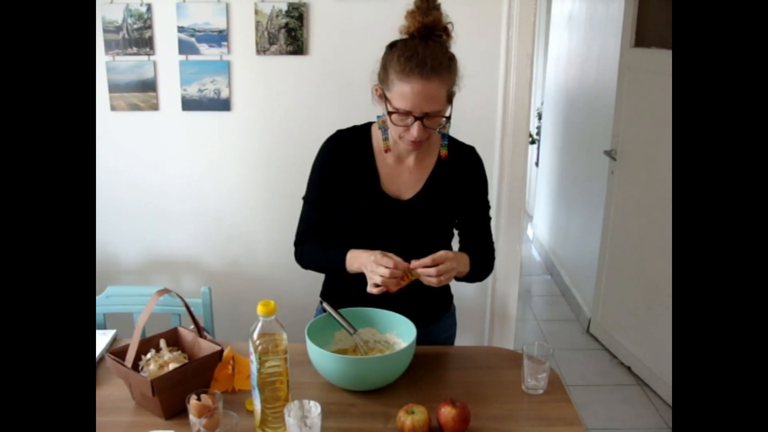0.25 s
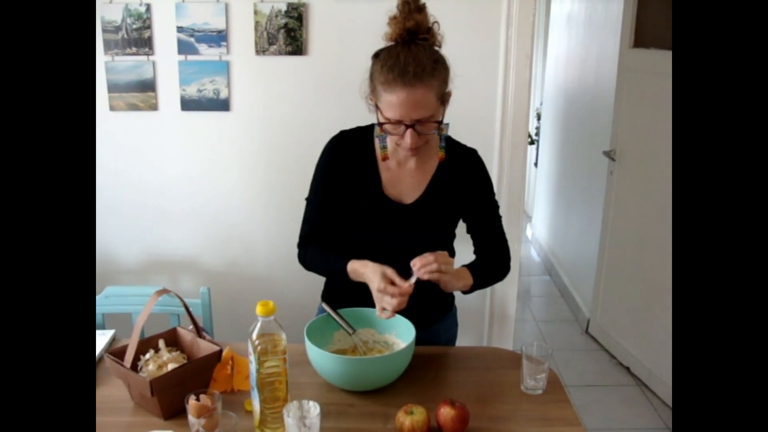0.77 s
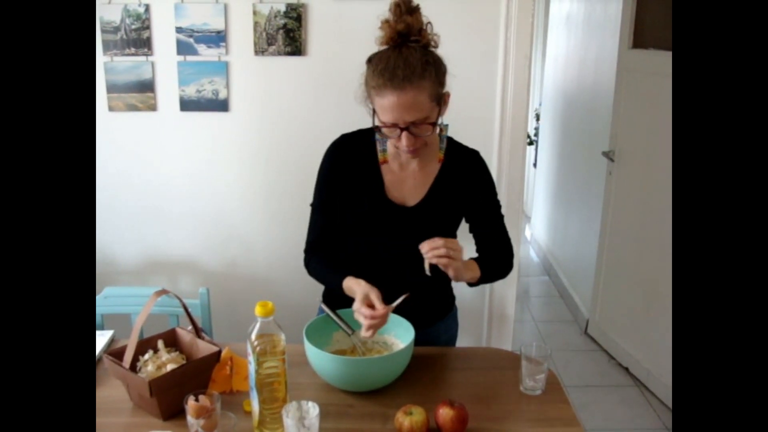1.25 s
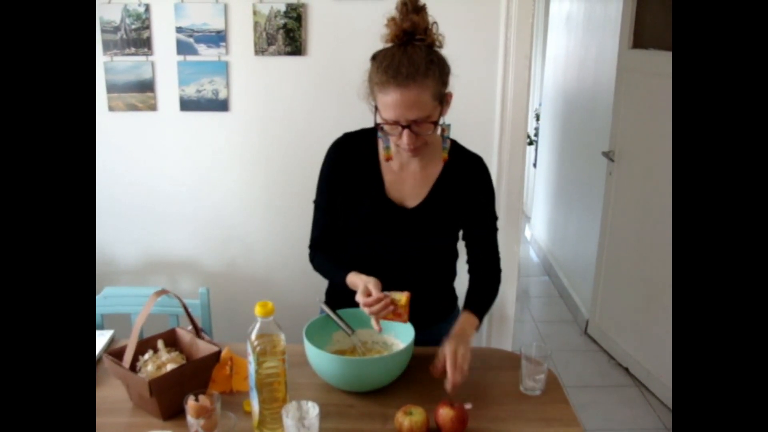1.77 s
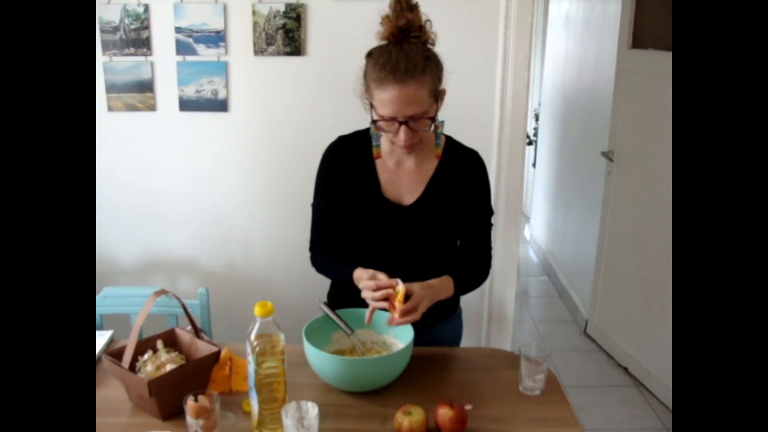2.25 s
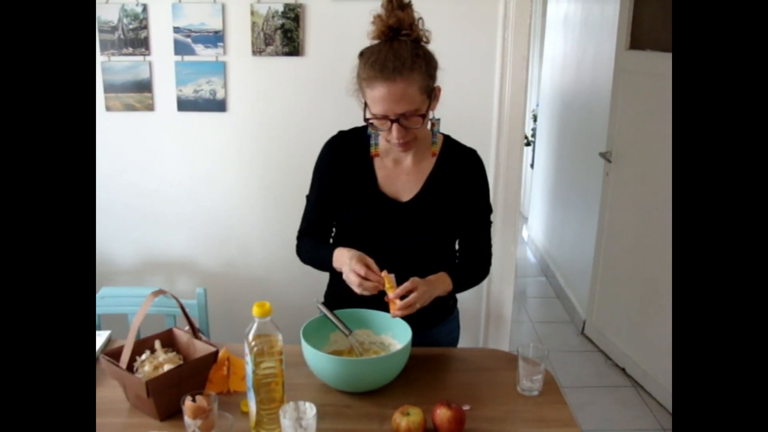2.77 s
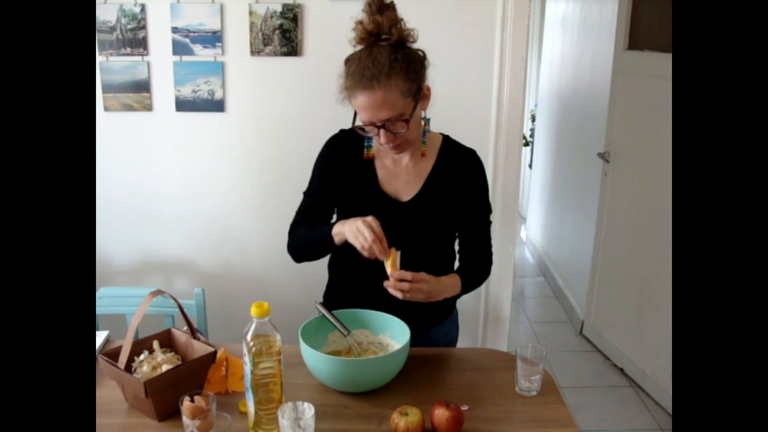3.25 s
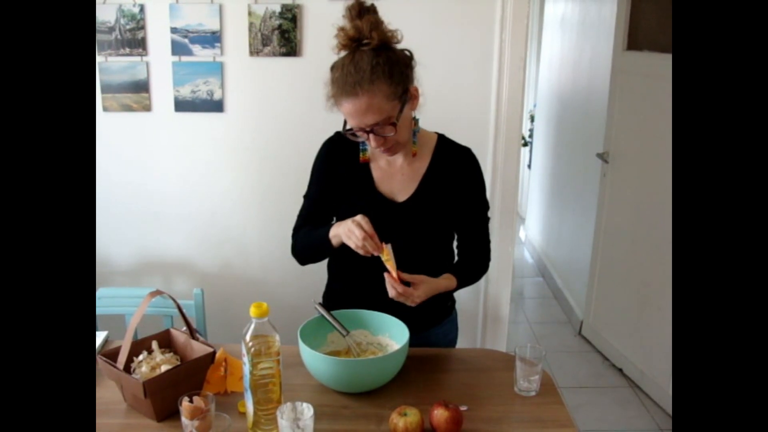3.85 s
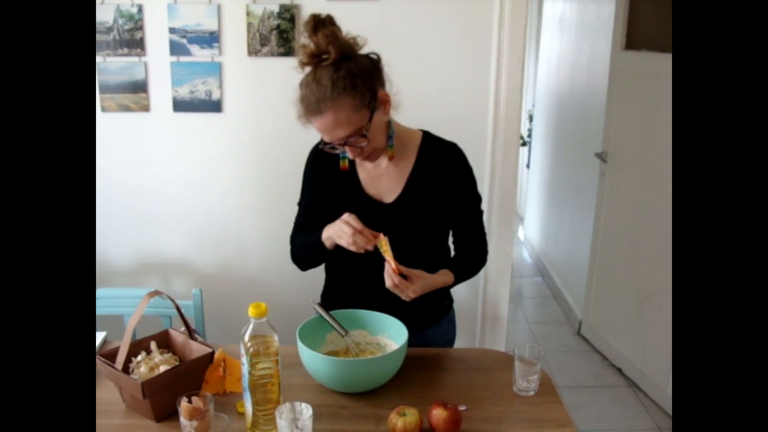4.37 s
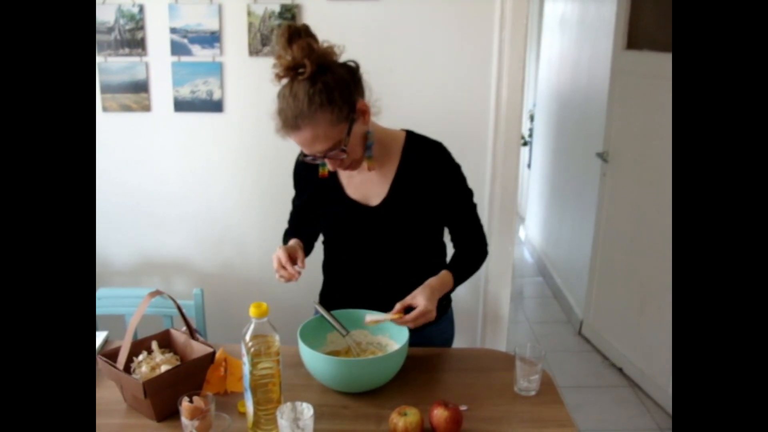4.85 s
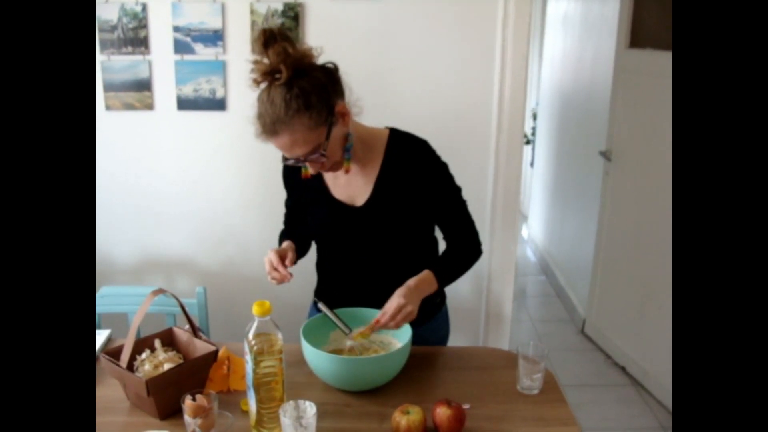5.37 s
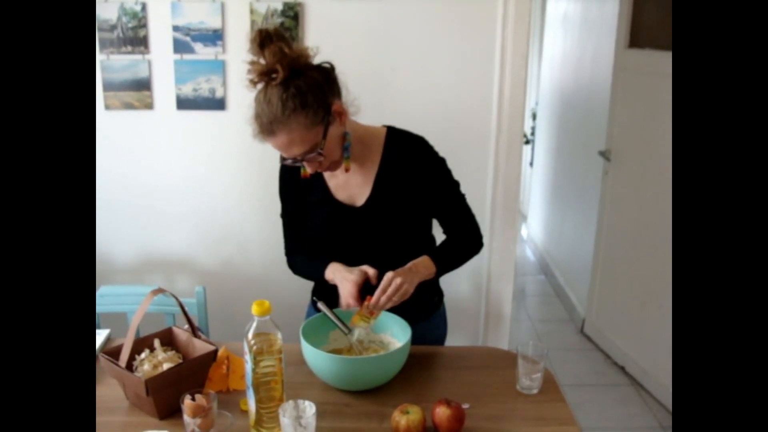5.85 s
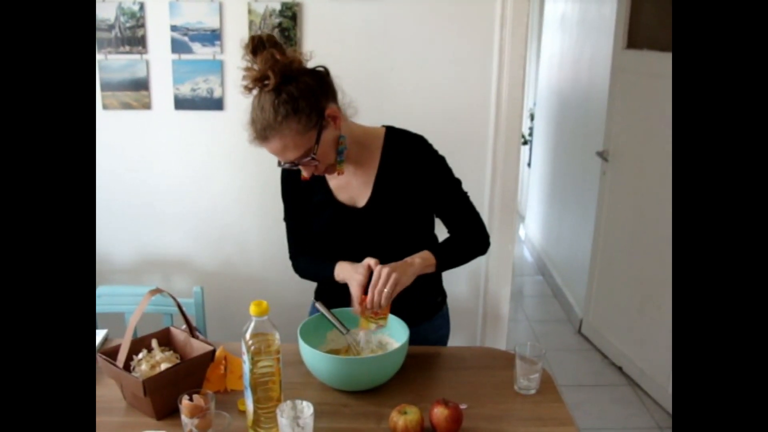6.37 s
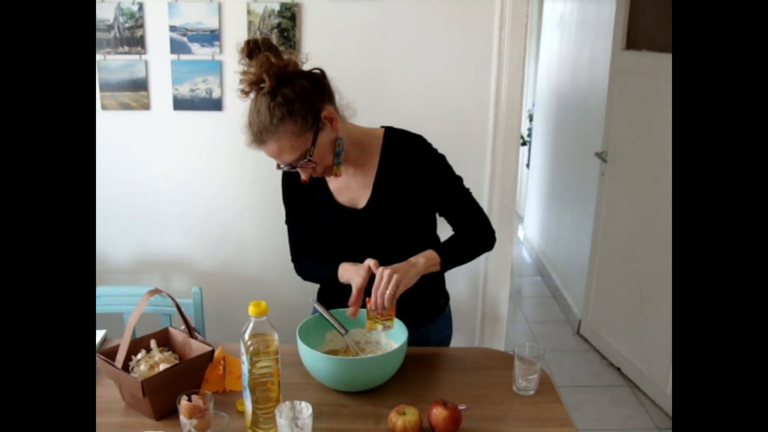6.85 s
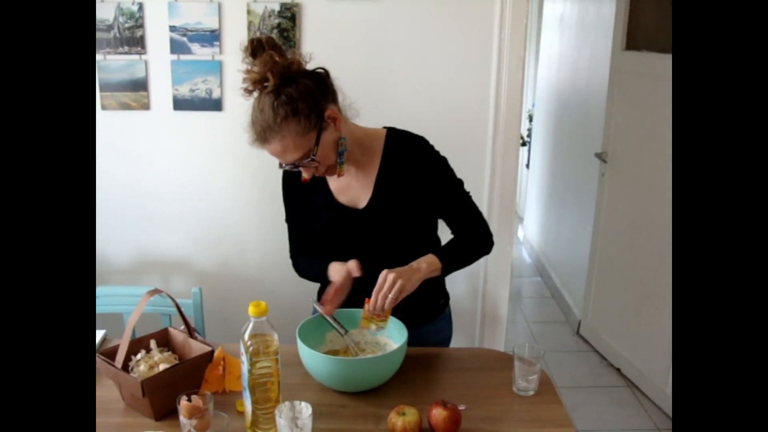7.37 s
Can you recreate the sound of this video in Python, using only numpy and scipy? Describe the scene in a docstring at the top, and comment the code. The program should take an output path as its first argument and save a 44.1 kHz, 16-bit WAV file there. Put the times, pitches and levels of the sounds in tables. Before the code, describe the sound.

A small paper packet is ripped open and crinkled in a hard kitchen, then briskly tapped over a bowl above steady hiss.

```python
"""A paper packet is ripped open in two pulls, made of grains of noise for the fibres letting go.
Fingers slide on it as rubbed noise and its creases snap as short impulses; a hand lands on a wooden table.
The packet is then tapped over a bowl, about six strong taps a second, with springing paper between them.
A small hard-walled kitchen answers every paper and hand sound with scattered echoes and a short tail.
Underneath lie a steady hiss with narrow whines and a low drone that swells near the end."""
import sys
import numpy as np
from scipy import signal
from scipy.fft import rfft, irfft, next_fast_len
from scipy.io import wavfile
from scipy.ndimage import map_coordinates

SR = 44100
rng = np.random.default_rng(int(sys.argv[2]) if len(sys.argv) > 2 else 0)


def to_wav(sig):
    """Store sig (one row per channel, or 1-D mono) as 16-bit WAV at the path in sys.argv[1].

    Samples outside -1..1 are clipped; the rate is SR.
    """
    pcm = np.clip(np.atleast_2d(sig), -1, 1) * 32767
    pcm = np.round(pcm).astype(np.int16)
    wavfile.write(sys.argv[1], SR, pcm.T)  # frames by channels


N = 335160
SHOT = 16384  # samples in one short sound or impulse response
TIME, SHOT_TIME = np.arange(N) / SR, np.arange(SHOT) / SR
SHOT_HZ = np.fft.rfftfreq(SHOT, 1 / SR)
TOP_HZ = 10080  # end of the treble

# Colour of the background hiss. Each row: frequency in Hz, relative level in dB.
HISS_COLOUR = [(13, -50), (22, -12), (171, -2), (244, -2.5), (429, -2.5), (540, -4), (924, -4), (1050, -6),
               (1620, -10), (1940, -9.5), (2570, -11.5), (2930, -7), (3410, -11.5), (5010, -12),
               (10000, -18), (13000, -62), (22000, -120)]
# Narrow whines in the hiss. Each row: frequency in Hz, width in Hz, lift in dB.
WHINES = [(917, 22, 7), (1370, 75, 5.5), (1940, 230, 6), (2893, 48, 8)]
# Low drone over time. Each row: time in seconds, level in dB.
DRONE_LEVELS = [(0, -82), (5.7, -78.5), (6.3, -64.5), (6.8, -74), (7.6, -78)]
HISS_DB, WHINE_DB = -53.5, -69.5
WAVER_DB, WAVER_RATE = 2, 4.7  # the highest whine comes and goes: depth, random points a second

# Decay of the room. Each row: frequency in Hz, time to fall 60 dB in seconds.
KITCHEN_DECAY = [(150, 0.4), (1000, 0.3), (2800, 0.28), (7000, 0.24), (10000, 0.2)]

# The hand landing on the table. Each row: start in seconds, strength in dB.
KNOCKS = [(1.648, -4.5), (1.656, -7.5)]
# Modes of the wooden table. Each row: frequency in Hz, mean level in dB, time to fall 60 dB in seconds.
WOOD_MODES = [(243, -11, 0.2), (321, -1.5, 0.12), (387, -0.5, 0.055), (438, 1.5, 0.061), (503, -7, 0.036),
              (591, -1, 0.083), (664, -2.5, 0.07), (986, -2, 0.05), (1130, 0.5, 0.042), (1490, -8, 0.083),
              (1690, -9, 0.067), (1950, -11, 0.045)]
# Dull bumps of the fingers on the packet. Each row: start in seconds, strength in dB, pitch in Hz.
BUMPS = [(2.786, -24, 385), (3.624, -26, 650), (3.644, -20.5, 616), (4.279, -17, 590), (4.372, -22, 610),
         (5.217, -15.5, 730)]

# Fingers sliding on the packet.
# Each row: moment of full level in seconds, length held in seconds, rub in dB, crinkle in dB.
SLIDES = [(0.01, 0.049, -61, -52), (0.626, 0.055, -47.5, -43.5), (0.761, .025, -51, -39.5),
          (1.338, 0.064, -61, -45.5), (2.243, 0.021, -74, -53.5), (2.45, 0.014, -49, -62),
          (2.875, 0.0079, -50, -74), (2.944, 0.053, -49, -46.5), (3.05, 0.035, -42, -44),
          (3.165, 0.04, -46, -47.5), (3.347, 0.089, -66, -50), (3.59, 0.09, -53, -50.5),
          (4.547, .12, -59, -64), (5.464, 0.028, -54, -45.5), (5.592, 0.0073, -62, -48),
          (5.937, .04, -54, -52), (6.1, 1.39, -59.5, -71), (6.317, .006, -55, -38), (6.758, .004, -54, -49)]
# Colour of skin on paper. Each row: frequency in Hz, relative level in dB.
RUB_COLOUR = [(150, -28), (400, -17.5), (650, -5), (1000, -2.5), (1600, 2), (2600, -3), (4000, -8),
              (10000, -55)]
# Colour of tiny wrinkles giving way. Each row: frequency in Hz, relative level in dB.
CRINKLE_COLOUR = [(1000, -24), (2500, 0), (3500, 0), (6500, -2), (10000, -13.5)]
SLIDE_ATTACK_S, SLIDE_RELEASE_S = 0.027, 0.021

# Resonances of the folded packet. Each row: frequency in Hz, width in Hz, lift in dB.
PACKET_RESONANCES = [(1526, 75, 6.5), (1930, 280, 5), (2360, 380, 6), (2930, 160, 2.5), (3360, 460, 3.5),
                     (3710, 310, 4), (5190, 1900, 1.5), (6030, 670, 2.5), (6800, 460, 3), (9400, 220, 0)]
# Colour of the puff of air. Each row: frequency in Hz, relative level in dB.
PUFF_COLOUR = [(50, -45), (300, -15.5), (470, -6.5), (600, 0), (750, -2), (970, -7), (1250, -1),
               (1700, -2.5), (3000, -37)]
FOLLOW_DELAY_S = 0.001412  # smaller folds give way this long after the first

# Creases snapping through.
# Each row: start in seconds, strength in dB, panel pitch in Hz, crack against the panel's ring in dB.
CREASES = [(0.1924, -12, 2810, 7), (0.2692, -19.5, 3000, 2), (0.3224, -13, 3030, -2.5),
           (0.4855, -10.5, 1500, 8.5), (0.5436, -15.5, 3580, 6), (0.5719, -17.5, 1510, -16),
           (0.5921, -13.5, 2320, 8), (0.6147, -12, 2200, 14), (0.7285, -8.5, 3670, 8),
           (1.3533, -13, 3150, 9), (1.4022, -7.5, 4240, 6), (1.6338, -6, 1720, 1), (2.3266, -20, 3690, 7),
           (2.388, -12.5, 3840, 7.5), (2.4299, -13.5, 3430, -2), (2.5032, -6, 4340, -4),
           (2.7036, -11, 3920, -17), (2.8926, 3.5, 3460, -0.5), (3.024, -10, 2110, -22),
           (3.041, -9, 2090, -5), (3.0749, -14, 1710, 6), (3.1611, -12, 1460, -17), (3.2053, 10, 2380, -1),
           (4.2752, -19, 2800, -22), (4.3707, -15, 2980, 1), (4.5361, -23, 3010, -22),
           (4.7017, -3.5, 2680, 1.5), (4.8434, -17, 1920, -11), (5.211, 2.5, 2650, 0),
           (5.3411, -12.5, 2140, -11), (5.4885, -16, 1910, -8), (5.866, -5, 4480, 1.5),
           (5.9009, -0.5, 2500, -4), (5.9773, -7, 3400, 1), (6.0209, -11.5, 1820, -5)]
# Colour of a crease's crack. Each row: frequency in Hz, relative level in dB.
CREASE_CRACK_COLOUR = [(2500, -33), (4300, -1.5), (5300, 2), (6400, 0), (7500, 1), (8600, 1.5), (10000, -9)]
CREASE_PUFF_DB = -13  # puff against the ring, for a crease of strength 0 dB
PUFF_PER_STRENGTH = -0.3  # the stronger a crease snaps, the less it puffs: dB per dB
CREASE_FOLLOW = 0.33  # share of the smaller folds that follow

# Finger taps and the packet springing back.
# Each row: start in seconds, strength in dB, crack against the panel's ring in dB.
TAPS = [(6.056, 5, -3.5), (6.0964, 5, -1), (6.1396, 4, 14), (6.2528, 6, -3), (6.316, 4, 11),
        (6.4294, 9, -0.5), (6.4365, 0.5, -12), (6.4768, -4, 0), (6.4892, 1, 12), (6.586, 3, -10),
        (6.5938, 2, 7), (6.656, -2, 1.5), (6.6852, -1.5, 17), (6.7737, 10, -4.5), (6.8223, -1.5, -3),
        (6.8678, -2, 7), (6.9284, 7, -3), (6.9937, 0, 1.5), (7.059, -2.5, 5), (7.1002, 9.5, -3.5),
        (7.1637, -5.5, -30), (7.23, -2, 7), (7.2768, 9, -3.5), (7.3355, -3.5, -10), (7.3966, -1, 9)]
# Colour of a tap's crack. Each row: frequency in Hz, relative level in dB.
TAP_CRACK_COLOUR = [(2500, -22.5), (4200, 0.5), (5000, 1.5), (6700, -2), (7500, -2.5), (8800, -2.5),
                    (10000, -9.5)]
# Air in the bowl. Each row: frequency in Hz, mean level in dB, time to fall 60 dB in seconds.
BOWL_MODES = [(463.5, 0.5, 0.089), (613, -2.5, 0.15), (702, 5, 0.073), (772, 3, 0.095), (870, -1, .12),
              (1094, 1.5, 0.13), (1263, 4, 0.11)]
TAP_PANEL_HZ = 3760  # every tap flips the same panel
TAP_DETUNE = 0.065  # but never bent quite the same way twice: typical share of its pitch
TAP_PUFF_DB = -15  # puff against the ring, for a crack of 0 dB
PUFF_PER_CRACK = -0.33  # the sharper the crack, the less air moves: dB per dB
TAP_FOLLOW = 0.14  # share of the smaller folds that follow
TICKS_DB, BOWL_DB = -15, -9  # stray ticks against the snap; the bowl's answer against the puff

# Pulls of the tear and the slow creep between them. Each row: moment of full level in seconds,
# length held in seconds, level halfway in dB, crisp treble against the body halfway in dB.
RIPS = [(0.776, 0.08, -31, 6), (0.893, 0.054, -51.5, -1), (0.972, 0.066, -44, -1.5),
        (1.043, 0.13, -39, 5.5)]
# Colour of the tearing fibres. Each row: frequency in Hz, relative level in dB.
TEAR_COLOUR = [(100, -49), (200, -31), (330, -10.5), (600, -14), (900, -13.5), (1200, -6), (2300, -3.5),
               (3700, -3.5), (4700, -6), (6200, -2.5), (8000, -4.5), (10000, -10.5)]
RIP_ATTACK_S, RIP_RELEASE_S = 0.0061, 0.024
RIP_BUILD_DB, RIP_DULL_DB = 3.5, 5  # over one pull the force grows and the treble dulls
SNAG_DB, SNAG_RATE = 0.5, 90  # the tear catches and runs on: depth, random points a second
TOUGH_DB, TOUGH_RATE = -10, 390  # a few tough fibres: level of their layer, number a second


def amp(db):
    """Decibels to gain."""
    return 10 ** (np.asarray(db) / 20)


def unit(x):
    """x at rms 1."""
    return x / np.sqrt(np.mean(x ** 2) + 1e-20)


def one_shot(x):
    """x at energy 1."""
    return x / (np.linalg.norm(x) + 1e-20)


def along(points, hz):
    """Points of frequency and value, read on a log frequency axis."""
    point_hz, values = np.transpose(points)
    return np.interp(np.log(hz + 1), np.log(point_hz + 1), values)


def hump(hz, centre_hz, width_hz, lift_db):
    """Gain of one resonance standing on a flat response."""
    return 1 + (amp(lift_db) - 1) / (1 + (2 * (hz - centre_hz) / width_hz) ** 2)


def resonance(centre_hz, quality):
    """Gain of a damped flap of paper, more sharply tuned at high quality; rms 1."""
    ratio = (SHOT_HZ + 1) / centre_hz
    detune = ratio - 1 / ratio
    return unit(1 / np.sqrt((1 + (quality * detune) ** 2) * (1 + (0.16 * detune) ** 2)))


def filtered(x, response):
    """x shaped by a gain that is a function of frequency."""
    size = next_fast_len(len(x) + SHOT)
    return irfft(rfft(x, size) * response(np.fft.rfftfreq(size, 1 / SR)), size)[:len(x)]


def causal(gain):
    """The most abrupt impulse with this spectrum: minimum phase, by folding the cepstrum."""
    cepstrum = irfft(np.log(gain + 1e-6))
    cepstrum[1:SHOT // 2] *= 2
    cepstrum[SHOT // 2 + 1:] = 0
    return irfft(np.exp(rfft(cepstrum)))


def add(track, s, sound):
    """Mix a sound into the track at time s."""
    part = track[max(round(s * SR), 0):][:len(sound)]
    part += sound[:len(part)]


def swell(s, length, attack, release):
    """Gain of one hand movement: it rises until s, holds for its length and dies away."""
    rise = np.clip((TIME - s) / attack + 1, 0, 1)
    return rise * np.exp(-np.clip((TIME - s - length) / release, 0, 20))


def wobble(rate):
    """A smooth random curve through this many random points a second."""
    knots = rng.standard_normal(SHOT)
    return map_coordinates(knots, [TIME * rate], mode="wrap")


def ringing(modes, attack):
    """One blow on an object, each mode at a new strength and phase; energy 1."""
    ring = np.zeros(SHOT)
    for hz, db, t60 in modes:
        decay = amp(db + rng.normal(0, 0.77) - 60 * SHOT_TIME / t60)
        ring += decay * np.sin(2 * np.pi * (hz * SHOT_TIME + rng.random()))
    return one_shot(ring * (1 - np.exp(-SHOT_TIME / attack)))


def kitchen(x, early_db, tail_db):
    """Direct sound, a scatter of echoes off bowl, table and near wall, then the dying room."""
    # the tail is noise that dies at its own pace in each band
    hz, t, bands = signal.stft(rng.standard_normal(SHOT), SR, nperseg=256)
    decay = amp(-60 * t / along(KITCHEN_DECAY, hz)[:, None])
    tail = signal.istft(bands * decay, SR, nperseg=256)[1][:SHOT]
    tail *= np.clip(SHOT_TIME / 0.0009, 0, 1)
    window = (SHOT_TIME > 0.0035) & (SHOT_TIME < 0.009)
    echoes = rng.choice([-1, 1], SHOT) * (rng.random(SHOT) < 3500 / SR)
    near = echoes * window * np.exp(-SHOT_TIME / 0.012)
    response = amp(early_db) * one_shot(near) + amp(tail_db) * one_shot(tail)
    response[0] += 1  # direct sound
    return signal.fftconvolve(x, one_shot(response))[:len(x)]


def background():
    """Steady hiss with narrow whines, the highest one wavering, and a low drone that swells near the end."""
    def colour(hz):
        return amp(along(HISS_COLOUR, hz)) * np.prod([hump(hz, *whine) for whine in WHINES], axis=0)

    hiss = amp(HISS_DB) * unit(filtered(rng.standard_normal(N), colour))
    centre_hz, width_hz, _ = WHINES[-1]
    whine = unit(filtered(rng.standard_normal(N),
                          lambda hz: 1 / (1 + ((hz - centre_hz) / width_hz) ** 2)))
    waver = amp(WHINE_DB + WAVER_DB * wobble(WAVER_RATE))
    drone_hz = 80.7
    drift = 0.0035 * np.cumsum(rng.standard_normal(N))
    phase = 2 * np.pi * drone_hz * TIME + drift
    drone = unit(np.sin(phase) + amp(-26) * np.sin(2 * phase))
    drone_gain = amp(np.interp(TIME, *np.transpose(DRONE_LEVELS)))
    return hiss + waver * whine + drone_gain * drone


def knocks():
    """The hand sets the table top ringing in its wood modes; finger pads thump the packet at one pitch each."""
    out = np.zeros(N)
    for s, db in KNOCKS:
        wood = ringing(WOOD_MODES, attack=0.00034)
        add(out, s, amp(db) * one_shot(kitchen(wood, early_db=-9.5, tail_db=-1.5)))
    for s, db, hz in BUMPS:
        thump = ringing([(hz, 0, 0.02)], attack=0.001)
        add(out, s, amp(db) * one_shot(kitchen(thump, early_db=-1, tail_db=0)))
    # small surfaces radiate little bass
    return signal.sosfilt(signal.butter(3, 170, "highpass", fs=SR, output="sos"), out)


def fibres(spectrum, rate, scatter_db):
    """Fibres letting go at random moments with uneven strength; rms 1."""
    strength = amp(scatter_db * np.clip(rng.standard_normal(N), -2, 2))
    sizes = strength * rng.choice([-1, 1], N)
    breaks = sizes * (rng.random(N) < rate / SR)
    return unit(signal.fftconvolve(breaks, causal(amp(along(spectrum, SHOT_HZ))))[:N])


def handling():
    """Skin rubs the paper while tiny wrinkles give way."""
    rub = fibres(RUB_COLOUR, rate=700, scatter_db=5)
    crinkle = fibres(CRINKLE_COLOUR, rate=830, scatter_db=7)
    out = np.zeros(N)
    for s, length, rub_db, crinkle_db in SLIDES:
        slide = swell(s, length, SLIDE_ATTACK_S, SLIDE_RELEASE_S)
        out += slide * (amp(rub_db) * rub + amp(crinkle_db) * crinkle)
    return kitchen(out, early_db=-3, tail_db=-3)


def smaller_folds(rate, settle):
    """A burst of small impulses that starts a moment after the snap and dies away; energy 1."""
    sizes = rng.standard_normal(SHOT) * (rng.random(SHOT) < rate / SR)
    burst = sizes * np.exp(-SHOT_TIME / settle)
    return one_shot(np.roll(burst, round(FOLLOW_DELAY_S * SR)))


def buckle(panel_hz, puff_db, crack_db, follow, crack_spectrum, quality, settle):
    """A paper panel flips: a puff of air, a brief ring, the crack of the fold, then smaller folds follow."""
    puff = amp(puff_db) * unit(amp(along(PUFF_COLOUR, SHOT_HZ)))
    ring = resonance(panel_hz, quality)
    crack = amp(crack_db) * unit(amp(along(crack_spectrum, SHOT_HZ)))
    packet = np.prod([hump(SHOT_HZ, *row) for row in PACKET_RESONANCES], axis=0)
    snap = causal(np.sqrt(puff ** 2 + ring ** 2 + crack ** 2) * packet)
    # the bending wave bounces between the packet's edges: a short train of pulses, same colour
    lap = np.exp(-2j * np.pi * SHOT_HZ * rng.uniform(0.00035, 0.0006))
    bounces = (lap - 0.7) / (1 - 0.7 * lap)
    folds = 1 + follow * rfft(smaller_folds(1500, settle))
    return one_shot(irfft(rfft(snap) * bounces * folds))


def creases():
    """Single panels snap through as the packet is bent and opened."""
    out = np.zeros(N)
    for s, db, panel_hz, crack_db in CREASES:
        puff_db = CREASE_PUFF_DB + PUFF_PER_STRENGTH * db
        snap = buckle(panel_hz, puff_db, crack_db, CREASE_FOLLOW, CREASE_CRACK_COLOUR,
                      quality=2.34, settle=0.0009)
        add(out, s, amp(db) * one_shot(kitchen(snap, early_db=0, tail_db=3)))
    return out


def stray_ticks(count, spread):
    """Small wrinkles pop just after a blow, each at its own pitch, the later the weaker; energy 1."""
    ticks = np.zeros(SHOT)
    for pitch, delay, size in rng.random((count, 3)):
        pop = causal(resonance(3000 + 4500 * pitch, quality=14))
        add(ticks, spread * delay, (1 - delay) * size * pop)
    return one_shot(ticks)


def tapping():
    """A finger strikes the upturned packet; the paper springs back with stray ticks and the bowl answers."""
    out = np.zeros(N)
    for s, db, crack_db in TAPS:
        puff_db = TAP_PUFF_DB + PUFF_PER_CRACK * crack_db
        panel_hz = TAP_PANEL_HZ * np.exp(TAP_DETUNE * rng.standard_normal())
        snap = buckle(panel_hz, puff_db, crack_db, TAP_FOLLOW, TAP_CRACK_COLOUR,
                      quality=2.3, settle=0.0044)
        ticks = amp(TICKS_DB) * stray_ticks(count=7, spread=0.068)
        bowl = amp(puff_db + BOWL_DB) * ringing(BOWL_MODES, attack=0.0051)
        add(out, s, amp(db) * one_shot(kitchen(snap + ticks + bowl, early_db=0.5, tail_db=2)))
    return out


def tearing():
    """Fibres break; each pull starts crisp and grows fuller as the force builds, snagging on its way."""
    common = fibres(TEAR_COLOUR, rate=6000, scatter_db=5)
    tough = fibres(TEAR_COLOUR, rate=TOUGH_RATE, scatter_db=6)
    grain = unit(common + amp(TOUGH_DB) * tough)
    treble = filtered(grain, lambda hz: 1 / (1 + (4800 / (hz + 1)) ** 6))
    body, treble = unit(grain - treble), unit(treble)
    out = np.zeros(N)
    for s, length, db, crisp_db in RIPS:
        progress = np.clip((TIME - s) / length, 0, 1) - 0.5  # 0 halfway through the pull
        force = amp(db + RIP_BUILD_DB * progress)
        pull = force * swell(s, length, RIP_ATTACK_S, RIP_RELEASE_S)
        out += pull * (body + amp(crisp_db - RIP_DULL_DB * progress) * treble)
    snags = amp(SNAG_DB * wobble(SNAG_RATE))
    return kitchen(out * snags, early_db=-5, tail_db=-4)


def scene():
    """All layers summed into one channel."""
    return (background() + knocks() + handling() + creases() + tapping() + tearing())[None]


def record(dry):
    """A steep low-pass, 200 Hz wide, ends the treble."""
    def band_limit(hz):
        return np.clip((TOP_HZ - hz) / 200 + 0.5, 0, 1)

    return np.array([filtered(x, band_limit) for x in dry])


dry = scene()
out = record(dry)
to_wav(out)
```